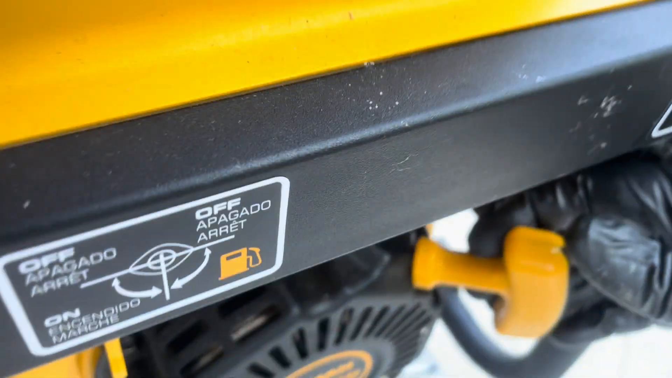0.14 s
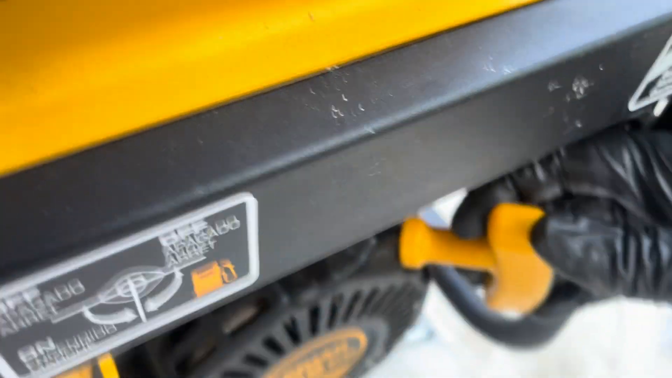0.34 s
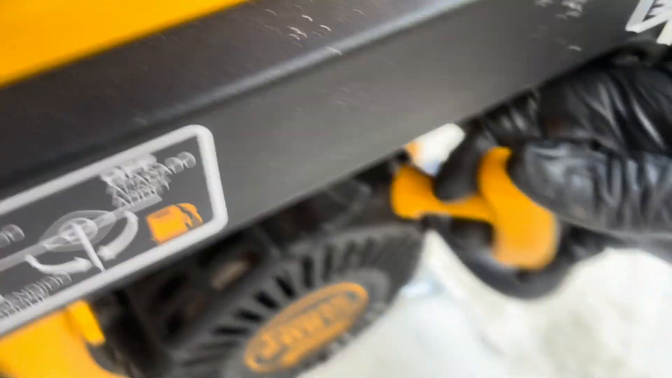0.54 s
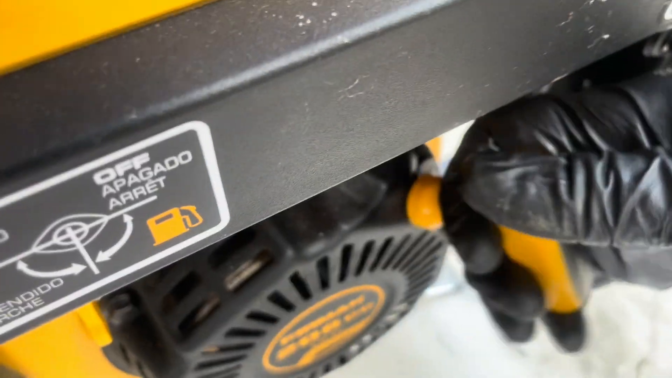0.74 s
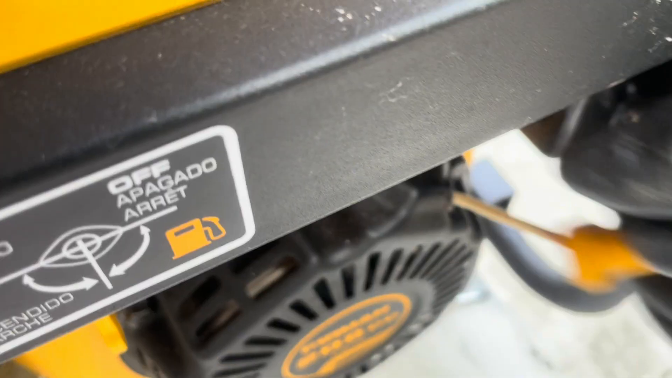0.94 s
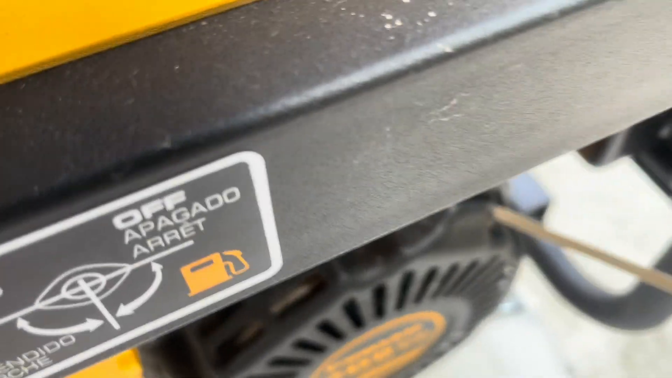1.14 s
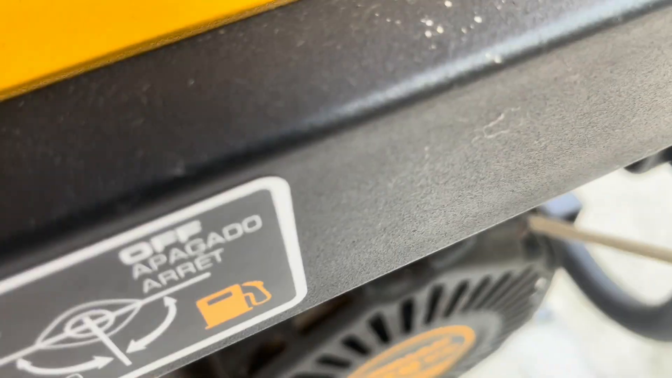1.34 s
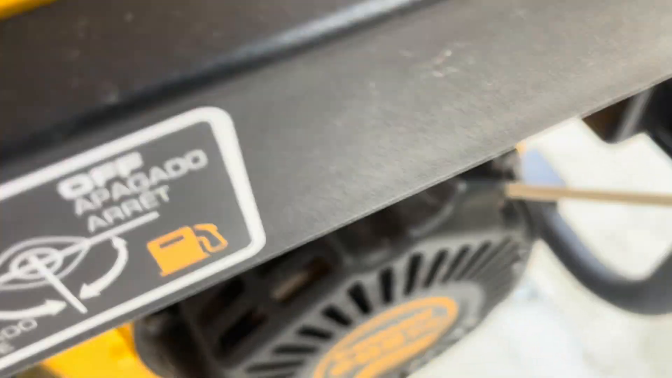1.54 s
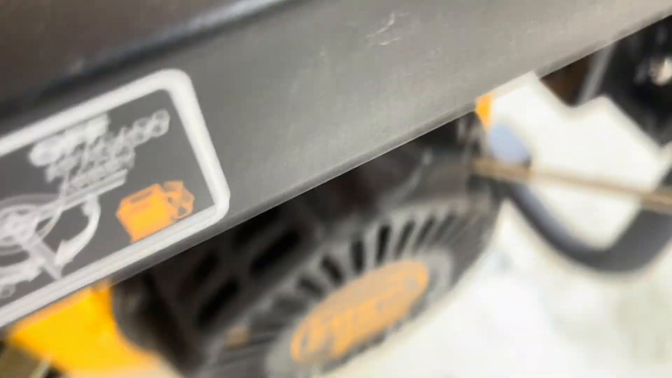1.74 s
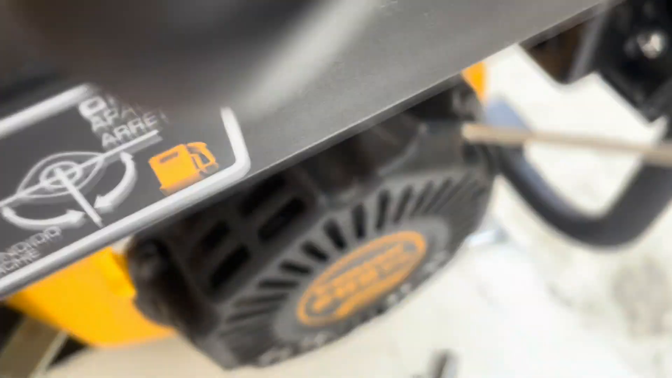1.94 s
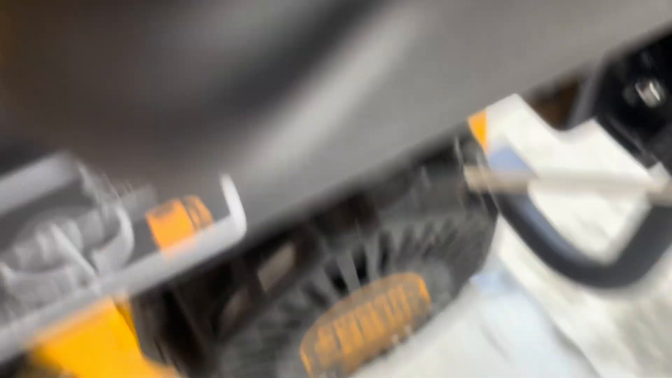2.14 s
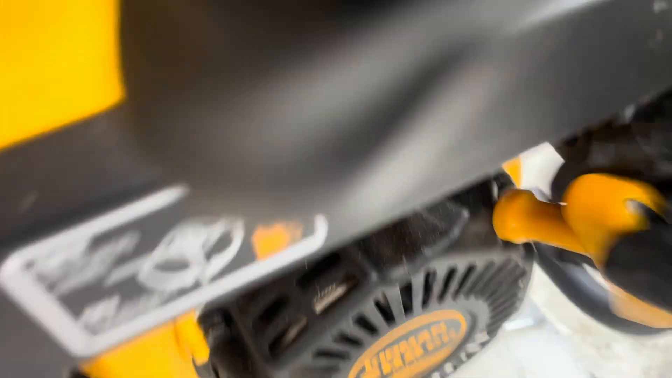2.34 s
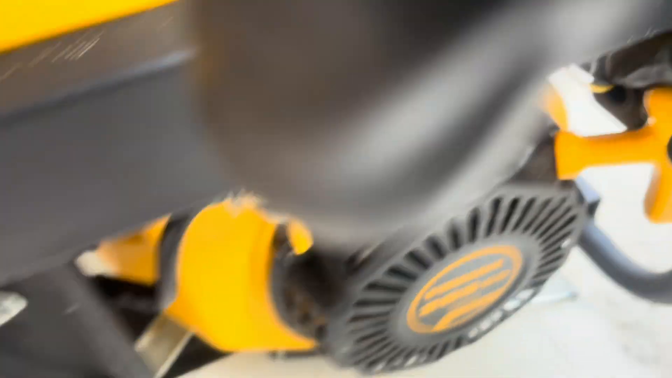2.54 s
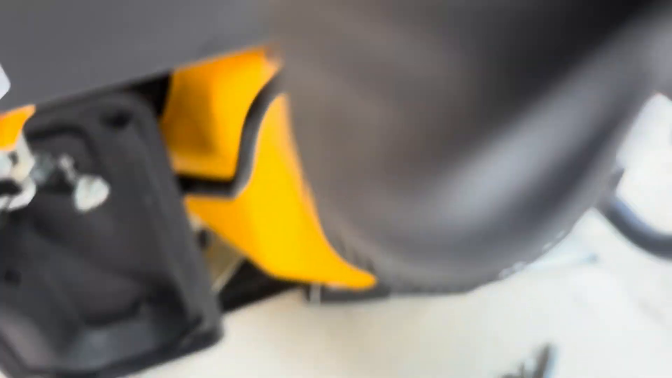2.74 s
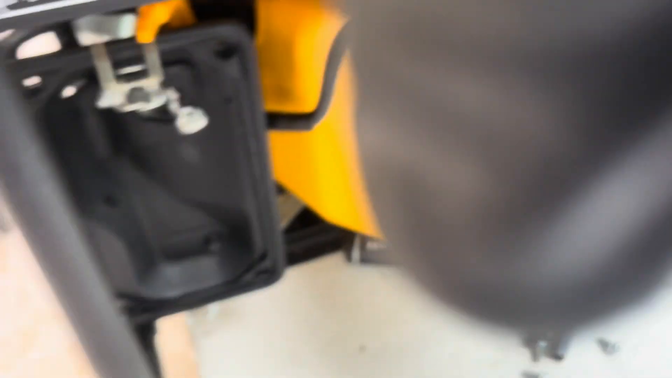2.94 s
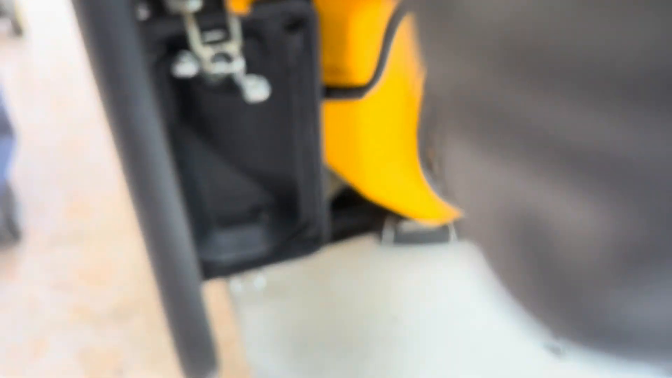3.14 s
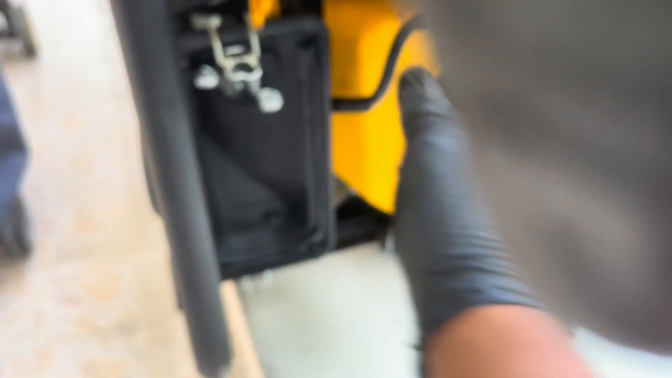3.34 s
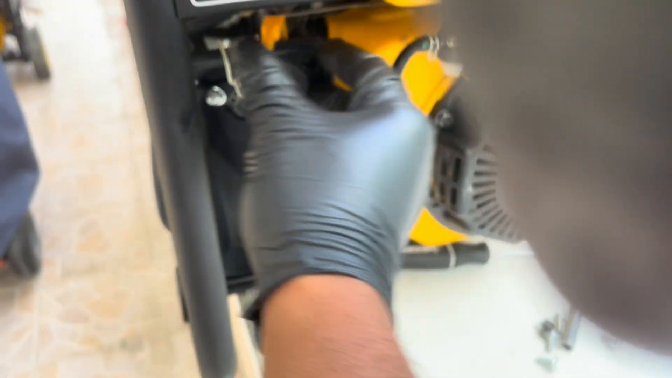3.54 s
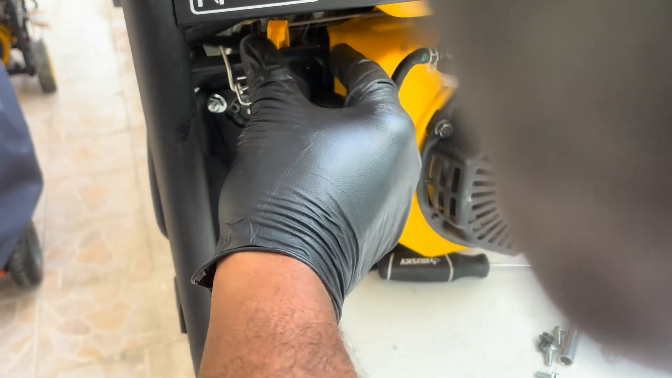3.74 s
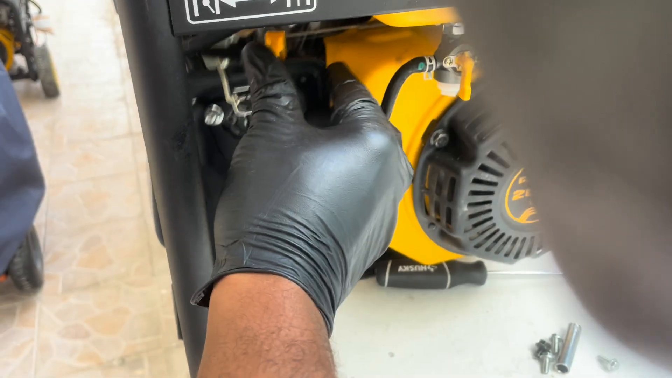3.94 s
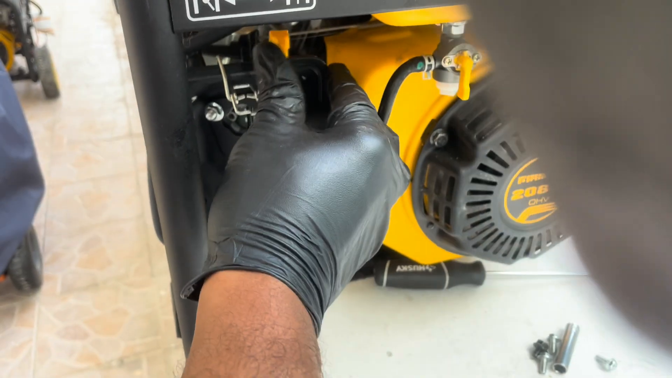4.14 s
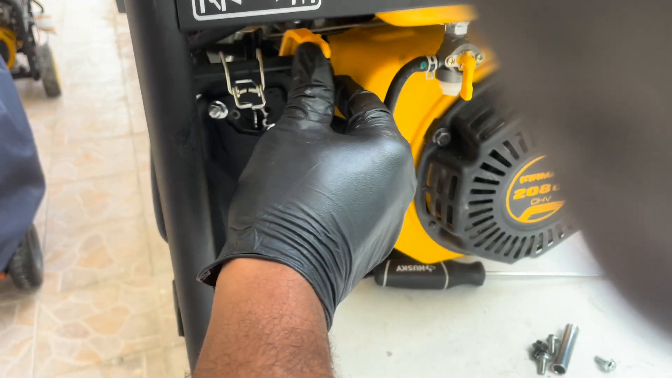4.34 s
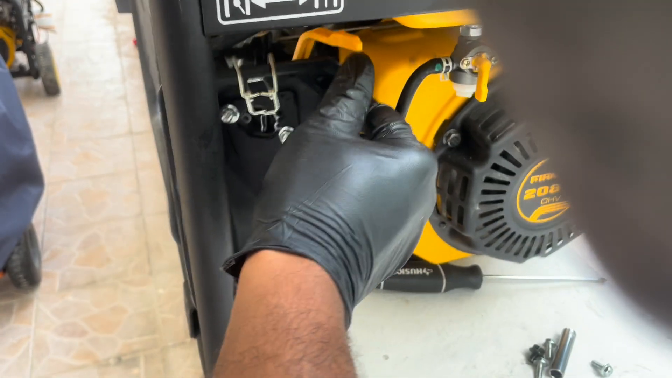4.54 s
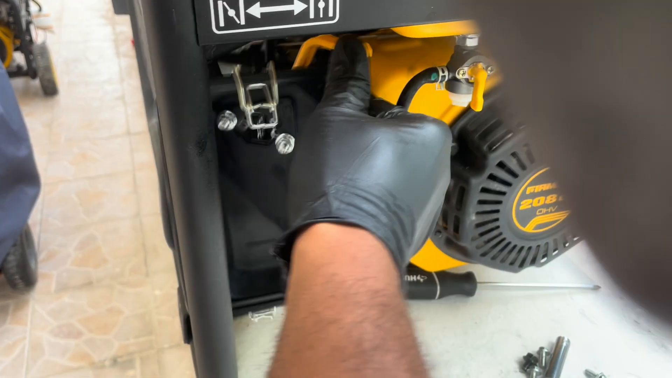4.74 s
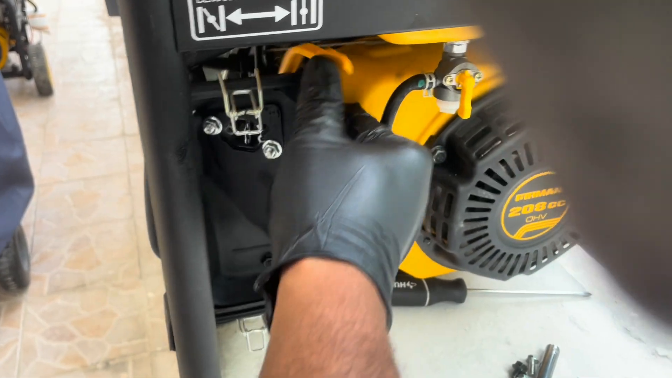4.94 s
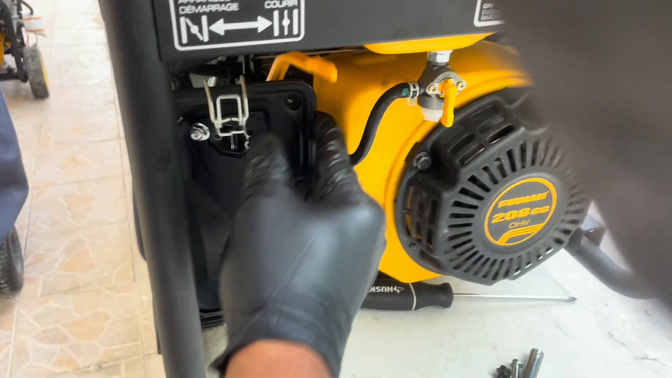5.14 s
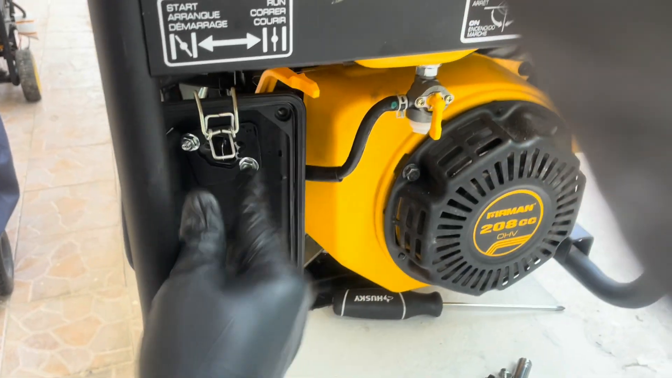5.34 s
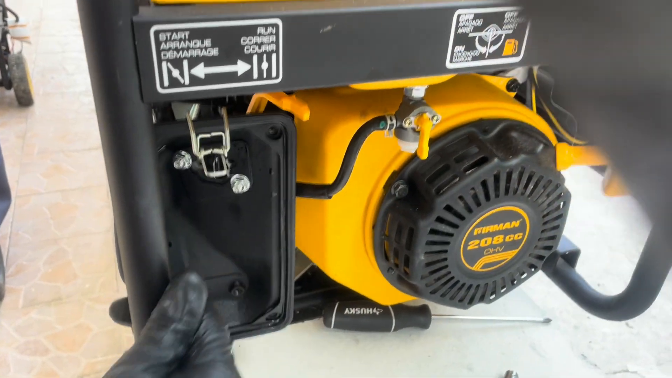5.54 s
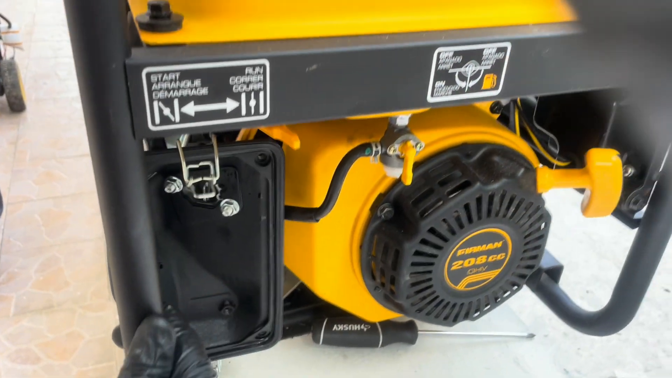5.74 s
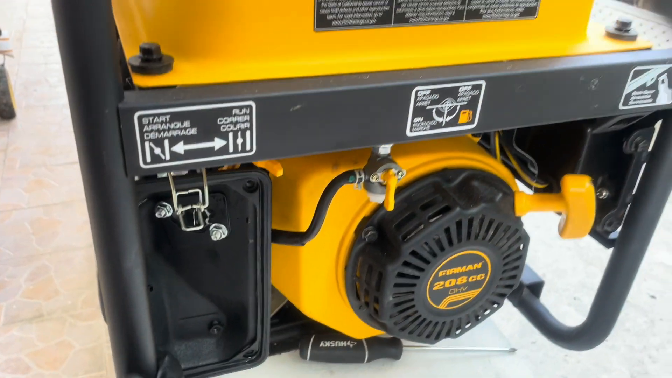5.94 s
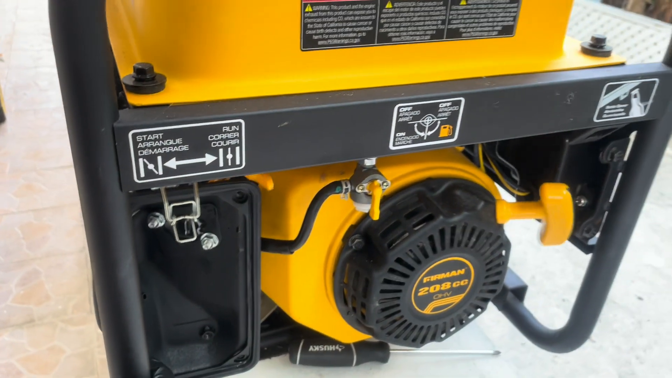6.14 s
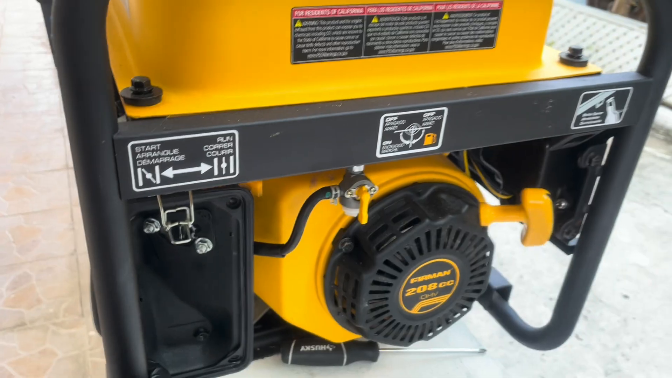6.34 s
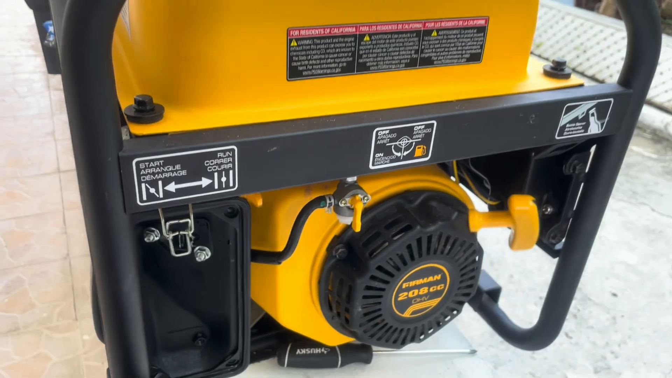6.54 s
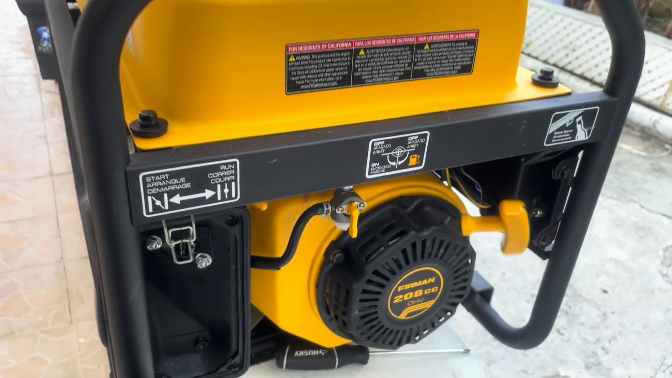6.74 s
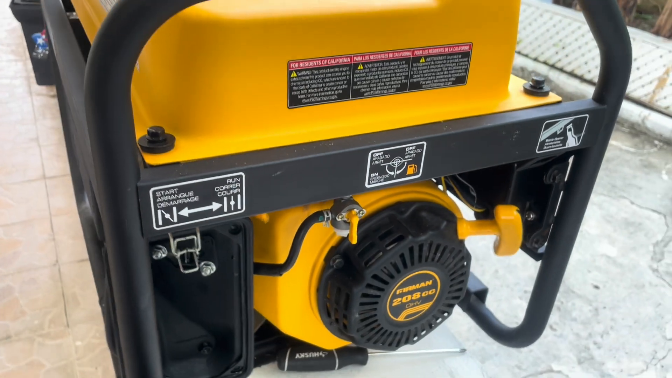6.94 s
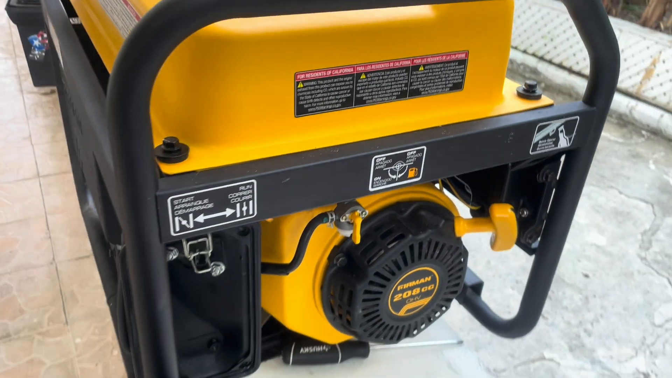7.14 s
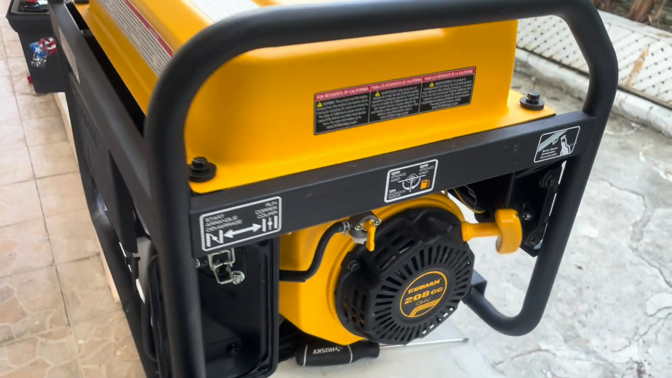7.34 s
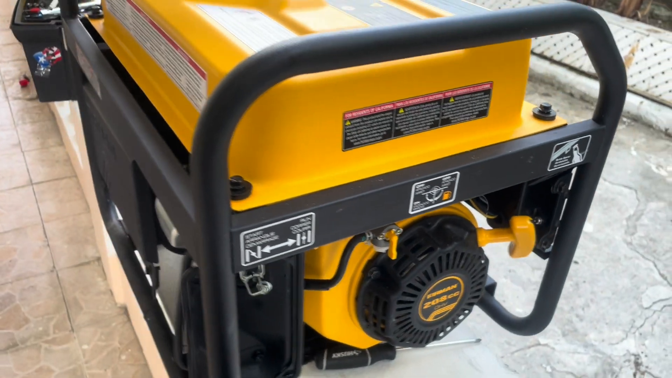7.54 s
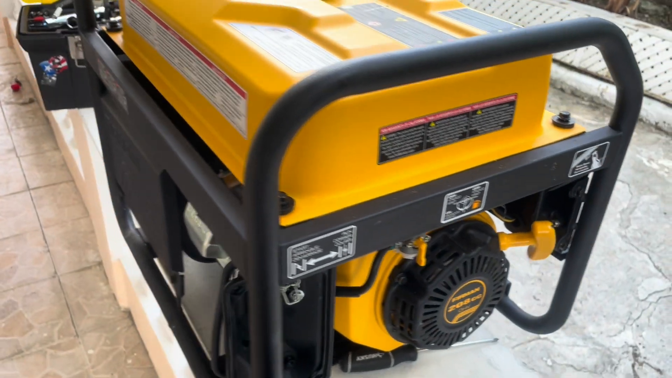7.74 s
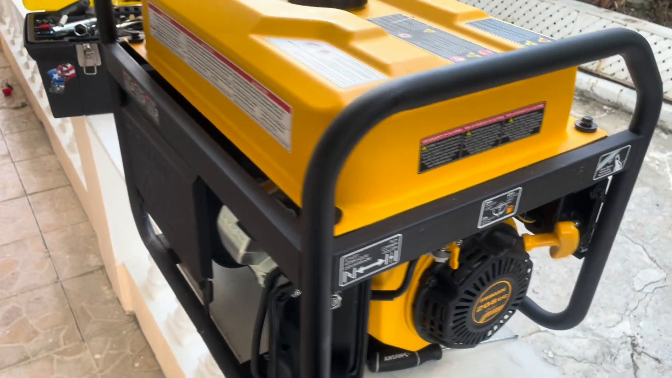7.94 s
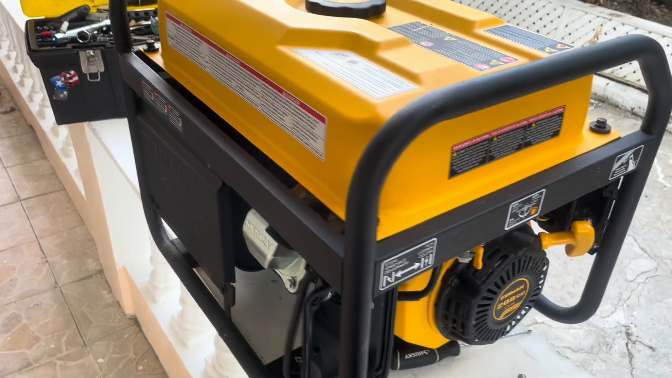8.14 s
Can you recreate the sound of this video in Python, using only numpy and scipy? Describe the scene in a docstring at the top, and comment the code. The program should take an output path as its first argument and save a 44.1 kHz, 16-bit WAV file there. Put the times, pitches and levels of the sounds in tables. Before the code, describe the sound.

A starter cord rasps and clicks, and a small engine catches, putters, surges to speed and runs smoothly outdoors.

```python
"""Pull-starting a small generator

Outdoors, the recoil pawls click and the cord rasps out by stick-slip friction. The single cylinder
catches and chugs slowly on the choke: firings knock the case, exhaust pulses excite the muffler and
loose valve gear rings the covers. As the choke opens the engine barks and surges to its governed
speed, where the strokes fuse into a drone. It runs on while the hand-held microphone backs away."""
import sys
import numpy as np
from scipy import signal
from scipy.fft import rfft, irfft, next_fast_len
from scipy.io import wavfile
from scipy.ndimage import uniform_filter1d

SR = 44100
rng = np.random.default_rng(int(sys.argv[2]) if len(sys.argv) > 2 else 0)


def store_pcm(level_fs):
    """Save levels as 16-bit WAV."""
    pcm = np.round(np.clip(level_fs, -1, 1) * 32767).astype(np.int16)
    wavfile.write(sys.argv[1], SR, np.atleast_2d(pcm).T)


N = 361179
TIME = np.arange(N) / SR
BURST_TIME = TIME[:SR // 2]

RETREAT_S = 5.84  # the microphone starts to back away
def engine():
    """Superposition: block, valve gear and airways follow one crank; distance shifts their balance."""
    firings, period, cycles = crank()
    pace = np.clip(period[-1] / period, 0, 1)  # share of full speed at each firing
    speed = np.interp(cycles - .3, np.arange(len(firings)), pace)  # the same at each sample
    running = np.clip((TIME - firings[0]) / 0.019, 0, 1)
    away_s = np.maximum(TIME - RETREAT_S, 0)
    valve_gear = running * rattle(firings, period, pace, cycles, speed)
    airways = running * (hiss(cycles, speed) + fan(speed))
    block = running * frame_hum(cycles, speed, away_s)
    block += knocks(firings, period, pace) + bark(firings, speed) + putts(firings, period, pace)
    block += running * exhaust(firings, period, pace, speed)
    valve_gear += clanks(firings, period, pace) + clacks()
    return amp(-1.24 * away_s) * block + amp(-.65 * away_s) * valve_gear + amp(.06 * away_s) * airways

# Slow firings on the choke: start_s, extra_knock_db, extra_thump_db, extra_hiss_db
CHUGS = [(1.835, 4, 11, 11), (1.988, 9, -1, 5.5), (2.145, 9.5, 2, 6), (2.278, 8, 0, -5), (2.414, 7, -.5, 0),
         (2.533, 6.5, 2, -0.5), (2.651, 8, 1, 3), (2.759, 4, 3, 2.5), (2.866, 4.5, 5, 7.5),
         (2.966, 2, 3.5, 3), (3.067, 6.5, 3, 7), (3.168, 4, 2, -1), (3.276, 1, 1.5, 0), (3.389, 0, -1, 1.5),
         (3.506, 4.5, -1, 1), (3.625, 2, 0, -5), (3.747, 4, -1, 0), (3.872, 3.5, -1, -5), (3.997, 6, 3, 2),
         (4.117, 2.5, 1.5, -3)]
# Crank speed once the choke opens, surging until the governor holds it: time_s, speed_rpm
CRANK_SPEED = [(4.2324, 1069.0), (4.36, 1671.0), (4.61, 3162.0), (4.72, 3796.0), (4.9, 3692.0),
               (5.4, 3786.0), (5.9, 3788.0), (6.2, 3768.0), (7.15, 3784.0), (7.7, 3749.0), (8.19, 3790.0)]
def crank():
    """A four-stroke fires every second revolution. Gives firing times, periods and cycles turned."""
    slow_s = [row[0] for row in CHUGS] + [CRANK_SPEED[0][0]]
    rpm = np.interp(TIME, *np.transpose(CRANK_SPEED), left=0)
    cycles = np.interp(TIME, slow_s, np.arange(len(slow_s))) + np.cumsum(rpm) / (120 * SR)
    firings = np.interp(np.arange(int(cycles[-1]) + 1), cycles[cycles > 0], TIME[cycles > 0])
    period = np.diff(firings)
    return firings, np.append(period, period[-1]), cycles

def chug_extras(times):
    """Cycle-to-cycle variation: extra knock, thump and hiss in dB, gone once the choke opens."""
    start_s, *extras = np.transpose(CHUGS)
    knots_s = np.append(start_s, CRANK_SPEED[0][0])
    return [np.interp(times, knots_s, np.append(db, 0)) for db in extras]

# Strength of combustion, near 0 in steady running: time_s, effort_db
EFFORT = [(1.835, -13), (2.08, -2.5), (2.5, 1), (2.72, 2.5), (3.05, 1.5), (3.55, -1.5), (4.12, -0.8),
          (4.33, 9), (4.5, 11), (4.66, 11.5), (4.86, 2.5), (5.3, 1.63), (8.19, -2)]
def effort(times):
    """Combustion is the driving force: its strength in dB at the given times."""
    return np.interp(times, *np.transpose(EFFORT))

def level(law, times, speed):
    """Power law: a part's level in dB follows effort up to a ceiling and shifts with speed."""
    base_db, db_per_effort_db, ceiling_db, full_speed_db = law
    return base_db + db_per_effort_db * np.minimum(effort(times), ceiling_db) + full_speed_db * speed

# Level law of the knock: base_db, db_per_effort_db, ceiling_db, full_speed_db
KNOCK_LAW = (-18, 0.6, 3.5, -12.5)
# Spectra of the dry slow knock and the sharp rap at speed: frequency_hz, level_db
THOCK_SPECTRUM = [(250, -17), (520, -20), (650, 8), (770, 9.5), (1000, -1), (1250, -3), (1550, -13),
                  (1900, -23), (2600, -17.5), (6000, -28.5), (12000, -35)]
RAP_SPECTRUM = [(150, -19), (300, -11), (470, -21), (620, 1), (1100, 5), (1550, -1.5), (1800, -8),
                (2300, -7), (4000, -11), (9000, -35)]
# Modes of crankcase and cover: pitch_hz, bandwidth_hz, level_db
CASE_MODES = [(705, 71, 4.5), (862, 35, -9), (952, 13, -20), (1428, 17, -2.5), (1780, 37, -32),
              (2100, 41, -34), (2530, 86, -30)]
def knocks(firings, period, pace):
    """Impact excitation: each firing knocks the case; a turn later the piston slaps more softly."""
    firing_db = level(KNOCK_LAW, firings, pace) + chug_extras(firings)[0]
    thock = spread(pulses(firings, amp(firing_db - 3 - 9.7 * pace ** 2)), burst(0.069, 0.0025) ** 2)
    thock *= patchy(noise(THOCK_SPECTRUM), depth_db=3, width_hz=200, length_s=0.028)
    times = np.append(firings, firings + .5 * period)
    knock_db = np.append(firing_db, firing_db - 6)
    pace = np.tile(pace, 2)
    scatter_db = 2.2 * rng.standard_normal(len(times))
    blows = pulses(times, amp(knock_db + scatter_db) * pace ** 2)
    grit = amp(-1.5) * spread(blows, burst(0.013, 0.00027)) * noise(BARK_SPECTRUM)
    # Dispersion: the bass arrives last.
    rap = amp(38) * filtered(blows, lambda hz: amp(along(RAP_SPECTRUM, hz)) * (1 + hz / 100) ** -3j)
    return rap + grit + thock + strike(CASE_MODES, times, knock_db - 3 - 14 * pace ** 3, rough=0.96)

# Firing, exhaust, intake, compression: cycle_share, level_db, db_per_effort_db, full_speed_db
STROKES = [(0, 2, 0, -2), (.31, 0.5, -0.26, -3.5), (0.518, -12.5, -0.3, 10), (.88, -4, -0.1, -6.5)]
# Modes of the muffler: pitch_hz, bandwidth_hz, level_db
MUFFLER_MODES = [(65, 35, -8), (160, 74, -3.5), (260, 150, -2.5), (366, 53, -2), (512, 85, -11)]
# Frame rocking on its mounts: frequency_hz, level_db
ROCK_SPECTRUM = [(35, -4.5), (70, 1), (110, 5.5), (220, -1), (380, -42), (520, -9.5), (1200, -65)]
# Level laws of puffs and rocking: base_db, db_per_effort_db, ceiling_db, full_speed_db
PUFF_LAW = (-41, 1.93, 14, 3.5)
ROCK_LAW = (-33, 1.37, 15, 3)
def exhaust(firings, period, pace, speed):
    """Cavity resonance: each stroke pushes air through the muffler; slow strokes also rock the frame."""
    share, stroke_db, db_per_effort_db, full_speed_db = np.transpose(STROKES)
    period, pace = period[:, None], pace[:, None]
    times = firings[:, None] + period * share
    push_db = stroke_db + db_per_effort_db * effort(firings)[:, None] + full_speed_db * pace ** 4
    scatter_db = rng.standard_normal(times.shape) * (2 - pace)
    pushes = pulses(times, amp(push_db + scatter_db) * np.sqrt(period))
    turbulence = unit(spread(pushes, burst(0.04, 0.0012)) * rng.standard_normal(N))
    puffs = unit(resonate(unit(pushes) + (.6 - 0.5 * speed) * turbulence, MUFFLER_MODES))
    puffs *= amp(level(PUFF_LAW, TIME, speed))
    rocking = unit(spread(pushes, burst(0.071, 0.002))) * noise(ROCK_SPECTRUM)
    rocking *= amp(level(ROCK_LAW, TIME, speed)) * np.clip(1.1 - speed ** 2, 0, 1)
    return amp(chug_extras(TIME)[1]) * (puffs + rocking)

# Crack under open throttle: frequency_hz, level_db
BARK_SPECTRUM = [(150, -17), (450, -6), (900, 5), (1700, -3), (2500, 5.5), (4500, -7), (8000, -3.5),
                 (15000, -13.5)]
# Modes of the tailpipe: pitch_hz, level_db, t60_s
PIPE_MODES = [(331, -2.5, .045), (417, -5, 0.038), (534, -0.5, 0.087)]
CHOKE_OPEN_S, GOVERNOR_S, SHUT_DB_PER_S = 4.2, 4.644, 99
def bark(firings, speed):
    """Pipe resonance: firings crack and boom in the tailpipe until the governor shuts the throttle."""
    times = firings[firings > CHOKE_OPEN_S]
    shut_db = SHUT_DB_PER_S * np.maximum(times - GOVERNOR_S, 0)
    strokes = pulses(times - .001, amp(-14.5 - shut_db))
    crack = spread(strokes, burst(0.048, 0.0075) ** 2) * noise(BARK_SPECTRUM)
    boom = sum(amp(db) * burst(t60, 0.013) * np.sin(2 * np.pi * hz * BURST_TIME)
               for hz, db, t60 in PIPE_MODES)
    return crack + amp(2.5) * speed ** 2 * spread(strokes, boom)

def putts(firings, period, pace, high_hz=1003, low_hz=69.4, fall_s=0.00856):
    """Damped chirps: each slow firing, and the exhaust stroke after it, gives a falling putt."""
    pitch_hz = low_hz + (high_hz - low_hz) * np.exp(-BURST_TIME / fall_s)
    putt = burst(.16, .03) ** 2 * np.sin(2 * np.pi * np.cumsum(pitch_hz) / SR)
    db = -20 + np.minimum(effort(firings), 3) - 24 * pace ** 2
    return spread(pulses(firings, amp(db - 5.5)) + pulses(firings + .29 * period, amp(db)), putt)

# Frame harmonics, drifting as the microphone retreats: firing_multiple, level_db, drift_db_per_s
HUM_HARMONICS = [(2, -0.5, 4.5), (3, -7, 3), (5, 0.5, 2), (7, -5, 4), (9, -6, 2), (12, 2, 2),
                 (16, 0.5, -10), (20, -4.5, -2), (25, -8, 8)]
# Level law of the hum: base_db, db_per_effort_db, ceiling_db, full_speed_db
HUM_LAW = (-37, 2.5, 4, -2)
def frame_hum(cycles, speed, away_s):
    """Forced vibration: the frame shakes at multiples of the firing rate."""
    hum = np.zeros(N)
    for multiple, db, drift in HUM_HARMONICS:
        gain = amp(db + drift * away_s + 2.5 * wobble(22))
        hum += gain * np.cos(multiple * (2 * np.pi * cycles + 0.031 * wobble(40)))
    return amp(level(HUM_LAW, TIME, speed)) * speed ** 4 * hum

# Contours over one cycle from the firing on: cycle_share, slow_rattle_db, fast_rattle_db, hiss_db
CYCLE_CONTOURS = [(0, 1.5, -1, -12), (.06, 10.5, 1.5, 6), (.15, -4, -3, 8.5), (.22, 6, 1, 9.5),
                  (.3, 6.5, -0.5, 0.5), (.4, -2.5, 1, -17), (.48, 6.5, -2.5, -5.5), (.62, 1.5, -1.5, -10.5),
                  (.8, -0.5, -2, -2), (.93, -3.5, -1, -20.5)]
def contours(cycles):
    """Periodic modulation: slow rattle, fast rattle and hiss contours in dB at each crank angle."""
    share, *columns = np.transpose(CYCLE_CONTOURS)
    return [np.interp(cycles % 1, share, db, period=1) for db in columns]

def flicker(db, speed):
    """Random modulation: a dB contour as a gain of rms 1, steadier at speed."""
    return unit(amp(db + (1.19 - speed) * 3.3 * wobble(55)))

# Contacts of gear teeth and valve gear: frequency_hz, level_db
RATTLE_SPECTRUM = [(250, -14), (550, -1), (720, -0.5), (880, 0.5), (1150, 0.5), (1480, 1), (1620, -1),
                   (1830, -10.5), (2200, -4), (3000, -8), (4200, -17.5), (7000, -17), (9500, -36)]
# Modes of the thin covers: pitch_hz, bandwidth_hz, level_db
COVER_MODES = [(730, 19, 3), (807, 21, -1), (948, 10.6, 4.5), (995, 7.8, 5.5), (1200, 49, -14.5),
               (1407, 14.4, 5.5), (1485, 29, -2.5), (2110, 53, -4), (2520, 17, -9), (3250, 72, -11.5),
               (4420, 20, -27)]
# Level law of the rattle: base_db, db_per_effort_db, ceiling_db, full_speed_db
RATTLE_LAW = (-32.5, 0.85, 3, 5.5)
def rattle(firings, period, pace, cycles, speed, count=90):
    """Backlash: gears touch at set crank angles; at low speed they rattle freely and ring the covers."""
    slow_db, fast_db, _ = contours(cycles)
    gate = flicker(slow_db * (1 - speed ** 2) + fast_db * speed ** 2, speed)
    loose = np.clip(1 - pace / .9, 0, 1)
    share = (np.arange(count) + rng.random(count)) / count
    force = rng.choice([-1, 1], count) * amp(2 * rng.standard_normal(count))
    chance = rng.standard_normal((len(firings), 2, count))
    jitter_s = (.00012 + .001 * loose[:, None]) * chance[:, 0]
    times = firings[:, None] + period[:, None] * share + jitter_s
    contacts = unit(pulses(times, force * amp(2 * chance[:, 1]) * np.sqrt(period[:, None]))) * gate
    scrape = unit(spread(np.abs(contacts), burst(0.011, 0.0006)) * rng.standard_normal(N))
    slack = np.interp(TIME, firings, loose)
    hits = (1 - 0.95 * slack) * unit(contacts) + (.5 + 0.85 * slack) * scrape
    ring = (0.051 + 1.57 * slack) * unit(resonate(hits, COVER_MODES))
    return amp(level(RATTLE_LAW, TIME, speed)) * (coloured(hits, RATTLE_SPECTRUM) + ring)

# Level law of the clanks: base_db, db_per_effort_db, ceiling_db, full_speed_db
CLANK_LAW = (-30.5, 1.69, 8, 10.5)
def clanks(firings, period, pace):
    """Plate resonance: at low speed the valves open and seat one by one, ringing the covers."""
    chance = rng.standard_normal((len(firings), 2, 3))
    share = [.28, .44, .54] + 0.0151 * chance[:, 0]
    times = firings[:, None] + period[:, None] * share
    db = (level(CLANK_LAW, firings, pace) - 30 * pace ** 2)[:, None] + 3 * chance[:, 1]
    return strike(COVER_MODES, times.ravel(), db.ravel(), rough=1.0)

# Blows of loose valve gear while the engine is slow: start_s, snap_db, cover_db
CLACKS = [(1.994, -17, -27), (2.066, -16, -36), (2.148, -19, -25), (2.1765, -22, -25), (2.2, -12.5, -22),
          (2.2825, -15, -24), (2.3141, -24, -19), (2.344, -9.5, -20), (2.415, -17, -16.5),
          (2.4633, -19, -21), (2.534, -16, -26), (2.5641, -24, -32), (2.587, -12, -22),
          (2.6549, -17, -18.5), (2.6773, -17, -25), (2.6943, -11.5, -20), (2.763, -12, -17),
          (2.7888, -17, -17), (2.8094, -17, -19), (2.8694, -18, -20), (2.8903, -14, -17),
          (2.9092, -10.5, -23), (2.9666, -24, -19), (2.9921, -20, -20), (3.01, -17, -19),
          (3.0244, -18, -22), (3.0699, -17, -19), (3.0939, -20, -17), (3.1094, -18, -21),
          (3.1702, -21, -14), (3.2, -22, -17), (3.2144, -16, -20), (3.2777, -16, -21), (3.3094, -21, -18),
          (3.3234, -21, -23), (3.3907, -18, -18), (3.4216, -23, -23), (3.44, -19, -20), (3.5089, -17, -14),
          (3.5548, -16, -19), (3.626, -21, -19.5), (3.6566, -15, -20), (3.7513, -12, -18),
          (3.7823, -17, -23), (3.8, -19, -20), (3.874, -15, -20), (3.905, -23, -28), (3.9294, -16.5, -26),
          (4.0024, -20, -23), (4.027, -21, -21), (4.0465, -14, -18), (4.1185, -10.5, -19),
          (4.149, -16, -18), (4.1694, -18, -22), (4.2428, -8, -21), (4.2747, -13, -14)]
# Spectra of a seating valve and of the thin covers: frequency_hz, level_db
VALVE_SPECTRUM = [(400, -23), (1000, -2), (1850, 1), (2400, 4.5), (3600, -0.5), (6500, -16), (9000, -7),
                  (15000, -30)]
COVER_SPECTRUM = [(500, -14), (900, -5), (1200, -6.5), (1480, 2), (1800, -19.5), (3000, -24.5)]
# Modes of steel rockers and pawls: pitch_hz, bandwidth_hz, level_db
STEEL_MODES = [(1527, 24, 1.5), (2380, 62, 5), (3070, 70, -3.5), (3820, 85, 3.5), (4330, 130, -2.5),
               (5670, 94, 3.5), (9330, 230, 3)]
def clacks():
    """Hard impacts are broadband: rockers and valves snap on steel and covers, each in a new colour."""
    times, snap_db, cover_db = np.transpose(CLACKS)
    snap = spread(pulses(times, amp(snap_db - 12)), burst(0.041, 0.0009))
    snap *= patchy(noise(VALVE_SPECTRUM), depth_db=5, width_hz=480, length_s=.04)
    cover = spread(pulses(times, amp(cover_db - 2)), burst(0.039, 0.00064))
    cover *= patchy(noise(COVER_SPECTRUM), depth_db=3.5, width_hz=200, length_s=.03)
    return snap + 1.5 * resonate(snap, STEEL_MODES) + cover + 0.49 * resonate(cover, COVER_MODES)

# Rush in the airways: frequency_hz, level_db
HISS_SPECTRUM = [(2000, 7), (4500, -1), (7200, 3.5), (10000, 17), (12500, 7), (15500, -4)]
# Level law of the hiss: base_db, db_per_effort_db, ceiling_db, full_speed_db
HISS_LAW = (-37, 1.66, 0.5, -3.5)
def hiss(cycles, speed):
    """Pulsating flow: the airways hiss in gusts that merge as the speed rises."""
    gusts = flicker((1.24 - speed) * contours(cycles)[2], speed)
    return amp(level(HISS_LAW, TIME, speed) + chug_extras(TIME)[2]) * gusts * noise(HISS_SPECTRUM)

# Cooling fan: frequency_hz, level_db
FAN_SPECTRUM = [(35, -26), (70, -21), (400, 5), (460, -11), (700, 1.5), (1200, -7), (1480, 4.5),
                (1650, -10.5), (1830, -7.5), (2100, -4), (2500, -14), (4200, -8.5), (7000, -29.5),
                (15000, -45)]
# Level law of the fan: base_db, db_per_effort_db, ceiling_db, full_speed_db
FAN_LAW = (-35, 0.53, -5, 5.5)
def fan(speed):
    """Turbulence: the cooling fan's broadband noise grows with speed."""
    return amp(level(FAN_LAW, TIME, speed)) * noise(FAN_SPECTRUM)

# Starter pawls snapping, a compression knock during the pull, stray cracks as the engine speeds up:
# start_s, snap_db, t60_s, case_knock_db, cup_ring_db
CLICKS_AND_BANGS = [(.734, -64, 0.092, -40.5, -80), (0.893, -29, 0.078, -60, -62),
                    (0.934, -25, 0.12, -54, -49), (1.003, -16.5, 0.029, -29, -65),
                    (1.046, -23, 0.052, -23, -56), (1.055, -9, 0.029, -19.5, -62),
                    (1.637, -26.5, 0.31, -13.5, -50), (1.69, -36, .05, -28, -52),
                    (1.718, -14.5, 0.075, -15, -32), (1.733, -27, 0.032, -26, -58),
                    (4.366, -21.5, 0.049, -10, -58), (4.795, -23.5, 0.01, -18.5, -70)]
# Their sharp snap: frequency_hz, level_db
SNAP_SPECTRUM = [(200, -11.5), (520, -9), (700, -5), (1100, 2), (1600, 2.5), (2500, -5.5), (4300, 0),
                 (6000, -4), (9500, -5.5), (15500, -7.5)]
# Modes of the steel starter cup and cover: pitch_hz, level_db, t60_s
CUP_MODES = [(636, 2, 0.19), (860, -3, 0.57), (1850, -13, 0.88), (2530, -15, 0.8), (4800, -12, 1.2),
             (2650, -15, .8), (7170, 3, 0.28), (7200, 2, 0.27), (8860, -2, 0.31)]
def clicks_and_bangs():
    """Free vibration: each sharp click or bang leaves the steel, the case and the starter cup ringing."""
    envelope = sum(np.pad(amp(db) * burst(t60, 0.00035), (round(start_s * SR), N))[:N]
                   for start_s, db, t60, _, _ in CLICKS_AND_BANGS)
    snaps = envelope * noise(SNAP_SPECTRUM)
    times, _, _, knock_db, ring_db = np.transpose(CLICKS_AND_BANGS)
    cup = sum(amp(db) * burst(t60, 0.00056) * narrowband(hz, 67, BURST_TIME)
              for hz, db, t60 in CUP_MODES)
    ring = spread(pulses(times, amp(ring_db)), cup) * amp(4 * wobble(220))  # the spinning cup flutters
    knock = strike(CASE_MODES, times, knock_db, rough=0.75)
    return 1.1 * snaps + 2 * resonate(snaps, STEEL_MODES) + knock + ring

# Rasp of the cord: frequency_hz, level_db
CORD_SPECTRUM = [(60, -26), (250, -5), (520, -9), (720, 1), (1100, -2.5), (2000, -10), (4000, -13),
                 (7000, -19), (10000, -19), (15000, -31)]
# Tugs (creep, taking up slack, drawing taut, the pull, the pull through compression):
# start_s, length_s, rasp_db, swell_db, pulley_db, pulley_start_hz, pulley_end_hz
TUGS = [(0.524, 0.41, -52, 3, -77, 690, 726), (0.938, 0.14, -30, 0, -33.5, 726, 844),
        (1.15, 0.14, -48, 14, -64, 880, 930), (1.268, 0.216, -27.5, 5, -38, 1105, 1041),
        (1.51, 0.19, -29.5, 13.5, -39, 1050, 800)]
def cord():
    """Stick-slip friction: the cord rasps in tiny slips, rings the covers and shakes the frame."""
    slips = spread(rng.exponential(1, N) * (rng.random(N) < 160 / SR), burst(0.095, .0004))
    rasp = noise(CORD_SPECTRUM) * (1 + 0.91 * unit(slips))
    rasp = patchy(rasp, depth_db=3, width_hz=300, length_s=0.02)
    shake = amp(-21 + 4 * wobble(12)) * noise(ROCK_SPECTRUM)
    pull = np.zeros(N)
    for start_s, length_s, rasp_db, swell_db, *_ in TUGS:
        progress = np.clip((TIME - start_s) / length_s, 0, 1)
        pull += amp(rasp_db + swell_db * progress) * tug(start_s, length_s, stop_db_per_s=208.5)
    return pull * (0.6 * rasp + 0.3 * unit(resonate(rasp, COVER_MODES)) + shake)

def pulley():
    """Rotation noise: the pulley's whirr glides with each tug's speed, and inertia carries it on."""
    whirr = np.zeros(N)
    for start_s, length_s, _, _, db, start_hz, end_hz in TUGS:
        pitch_hz = np.interp(TIME, [start_s, start_s + length_s], [start_hz, end_hz])
        whirr += amp(db) * tug(start_s, length_s, stop_db_per_s=134.5) * narrowband(pitch_hz, 220, TIME)
    return whirr

def tug(start_s, length_s, stop_db_per_s, attack_s=0.014, surge_hz=7.1):
    """Envelope of a tug: a quick start, surges as the crank turns over, an exponential run-down."""
    t = TIME - start_s
    surge_db = -0.5 * np.cos(2 * np.pi * surge_hz * np.clip(t, 0, length_s))
    return np.clip(t / attack_s, 0, 1) * amp(surge_db - stop_db_per_s * np.maximum(t - length_s, 0))

# The reel rubbing its housing, and at 2.59 s the handle knocking it: start_s, length_s, pitch_hz, bandwidth_hz,
# level_db
HOUSING_SOUNDS = [(1.338, .025, 1430, 397, -28), (1.369, 0.024, 835, 200, -28), (1.414, 0.024, 1390, 600, -30),
                  (1.451, 0.033, 4500, 2520, -37), (1.471, 0.048, 1064, 353, -24), (1.628, 0.034, 788, 200, -18),
                  (1.655, .04, 5200, 350, -36), (1.684, 0.017, 1540, 397, -26), (2.343, 0.05, 797, 198, -18),
                  (2.591, 0.026, 1487, 196, -19.5)]
# Pawl ticks as the cord winds back: start_s, level_db
REWIND_TICKS = [(2.103, -29), (2.376, -29), (2.488, -44)]
def reel():
    """Sliding friction: the reel squawks against its housing, the handle knocks it once, and the pawls tick
    past the cup."""
    times, tick_db = np.transpose(REWIND_TICKS)
    sound = spread(pulses(times, amp(tick_db)), burst(0.029, 0.0018)) * noise(HISS_SPECTRUM)
    for start_s, length_s, hz, width_hz, db in HOUSING_SOUNDS:
        t = TIME[:int(length_s * SR)]
        squawk = amp(db) * np.sin(np.pi * t / length_s) * narrowband(hz, width_hz, t)
        sound[round(start_s * SR):][:len(t)] += squawk
    return sound

# Soft bumps of the hand: start_s, level_db
HAND_BUMPS = [(0.028, -39), (0.238, -42), (.256, -31.5), (0.305, -24), (0.412, -38), (1.027, -46),
              (1.188, -33.5), (1.49, -25.5)]
def handling():
    """Structure-borne sound: the hand gives the microphone dull thuds that sink in pitch."""
    times, db = np.transpose(HAND_BUMPS)
    pitch_hz = 55 + 450 * np.exp(-BURST_TIME / 0.0066)
    thud = burst(0.29, 0.00068) * np.sin(2 * np.pi * np.cumsum(pitch_hz) / SR)
    return spread(pulses(times, amp(db - 1.5)), thud)

# Outdoor air: frequency_hz, level_db
AIR_SPECTRUM = [(25, 3), (60, 1.5), (180, 1), (400, -5.5), (1000, -10), (2500, -20.5), (7000, -34),
                (15000, -39)]
def yard():
    """Ambient noise: a faint rumble that drops a little early on."""
    return amp(np.interp(TIME, [.4, .55], [-46, -50])) * noise(AIR_SPECTRUM)

def reflections(x, t60, wet_db, size=8192):
    """Scattering: tank, frame and paving add a short tail per channel, changing as the microphone moves."""
    hop = size // 2
    pieces = signal.stft(x, nperseg=size, nfft=2 * size)[2].T
    tails = rng.standard_normal((2, len(pieces), hop)) * burst(t60, 0.0017)[:hop]
    tails /= np.linalg.norm(tails, axis=-1, keepdims=True)
    tails = signal.sosfilt(signal.butter(1, 800, "high", fs=SR, output="sos"), tails)
    echoes = irfft(pieces * rfft(tails, 2 * size)) * hop
    at = (np.arange(len(pieces))[:, None] * hop + np.arange(2 * size)).ravel()  # overlap-add positions
    return x + amp(wet_db) * np.array([np.bincount(at, echo.ravel())[hop:][:N] for echo in echoes])

def strike(modes, times, db, rough):
    """Modal excitation: each blow grinds briefly and shares its force anew among the modes."""
    scatter_db = rng.standard_normal((len(times), len(modes)))
    contact = burst(0.04, 0.00028)
    grind = spread(pulses(times, amp(db)), contact / np.linalg.norm(contact)) * rng.standard_normal(N)
    blows = [pulses(times, amp(db + column)) for column in scatter_db.T]
    return amp(40.5) * sum(resonate(x + rough * grind, [mode]) for x, mode in zip(blows, modes))

def resonate(x, modes):
    """Modal sum: x through parallel resonators of alternating sign."""
    return sum((-1) ** k * amp(db) * signal.lfilter(*signal.iirpeak(hz, hz / width_hz, fs=SR), x)
               for k, (hz, width_hz, db) in enumerate(modes))

def patchy(x, depth_db, width_hz, length_s):
    """Spectral modulation: x with peaks that come and go at random, at rms 1."""
    hz, t, spectra = signal.stft(x, SR, nperseg=256)
    knots = rng.standard_normal((200, 1500))
    rows = np.minimum(hz / width_hz, 199).astype(int)
    columns = (t / length_s).astype(int) % 1500
    field = uniform_filter1d(knots[rows][:, columns], size=2, axis=0)
    field = uniform_filter1d(field, size=3, axis=1)
    return unit(signal.istft(spectra * amp(depth_db * field), SR, nperseg=256)[1][:N])

def narrowband(hz, width_hz, t):
    """Quadrature modulation: a narrow band of noise around a pitch, over the times t."""
    phase = 2 * np.pi * np.cumsum(np.broadcast_to(hz, t.shape)) / SR
    a, b = (np.interp(t * width_hz, np.arange(4000), knots) for knots in rng.standard_normal((2, 4000)))
    return unit(a * np.sin(phase) + b * np.cos(phase))

def wobble(rate_hz):
    """A random curve with rate_hz knots a second."""
    knots = rng.standard_normal(int(N * rate_hz / SR) + 2)
    return np.interp(TIME * rate_hz, np.arange(len(knots)), knots)

def burst(t60, attack_s):
    """Exponential decay after a quick rise: half a second, peak 1."""
    shape = amp(-60 * BURST_TIME / t60) * (1 - np.exp(-BURST_TIME / attack_s))
    return shape / shape.max()

def pulses(times, sizes):
    """An impulse train."""
    at = np.clip(np.round(np.ravel(times) * SR).astype(int), 0, N)
    return np.bincount(at, np.ravel(sizes), N + 1)[:N]

def spread(x, shape):
    """Convolution: every impulse of x sets off the shape."""
    return signal.oaconvolve(x, shape)[:N]

def noise(spectrum):
    """Gaussian noise with a spectrum, at rms 1."""
    return coloured(rng.standard_normal(N), spectrum)

def coloured(x, spectrum):
    """x shaped by a spectrum, at rms 1."""
    return unit(filtered(x, lambda hz: amp(along(spectrum, hz))))

def filtered(x, response):
    """Linear filtering by a complex frequency response."""
    size = next_fast_len(N + SR // 4, real=True)
    return irfft(rfft(x, size) * response(np.fft.rfftfreq(size, 1 / SR)), size)[..., :N]

def along(points, hz):
    """Interpolation on a log frequency axis."""
    knots_hz, values = np.transpose(points)
    return np.interp(np.log(hz + 1), np.log(knots_hz + 1), values)

def unit(x):
    """Scale to rms 1."""
    return x / np.sqrt(np.mean(x ** 2) + 1e-20)

def amp(db):
    """Decibels to gain."""
    return 10 ** (np.asarray(db) / 20)

def scene():
    """Superposition: engine and starter with their reflections, hand bumps and the quiet yard."""
    generator = engine() + cord() + clicks_and_bangs() + pulley() + reel()
    return reflections(generator, t60=.06, wet_db=-4.5) + handling() + yard()

# Balance as the microphone turns: time_s, left_minus_right_db
PAN = [(.3, 0.5), (1.5, 1.1), (2.2, 1.2), (2.8, -0.6), (5.3, -0.9)]
# Level difference between its two ports: frequency_hz, left_minus_right_db
PORT_TILT = [(60, 3.2), (380, 3.1), (700, 4.7), (2400, 4.9), (8000, 0.6)]
# Phase difference between them: frequency_hz, left_lead_rad
PORT_LEAD = [(60, 0), (600, .2), (1700, -.3), (2800, .2), (5900, 0), (7240, -1.8), (8200, -3.1),
             (11500, -6.3), (14500, -9.4)]
def record(dry, low_cut_hz=42, top_hz=15700):
    """Spaced-pair stereo: two ports differ in level and phase; peaks round off, the band is limited."""
    side = np.array([[.5], [-.5]])
    tilt = lambda hz: amp(side * along(PORT_TILT, hz))
    lead = lambda hz: np.exp(1j * (side + .5) * along(PORT_LEAD, hz))
    low_cut = lambda hz: hz ** 3 / np.sqrt(hz ** 6 + low_cut_hz ** 6)
    panned = dry * amp(side * np.interp(TIME, *np.transpose(PAN)))
    ports = filtered(panned, lambda hz: tilt(hz) * lead(hz) * low_cut(hz))
    rounded = ports / (1 + np.abs(ports / .92) ** 4) ** .25
    return filtered(rounded, lambda hz: hz < top_hz)

dry = scene()
out = record(dry)
store_pcm(out)
```